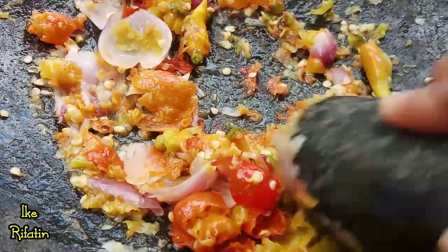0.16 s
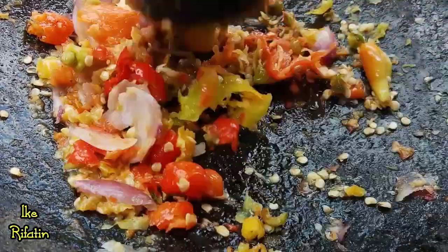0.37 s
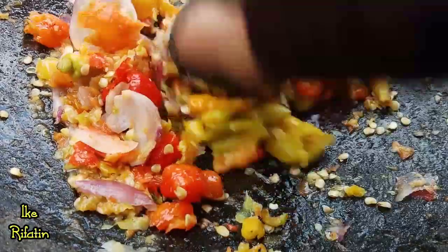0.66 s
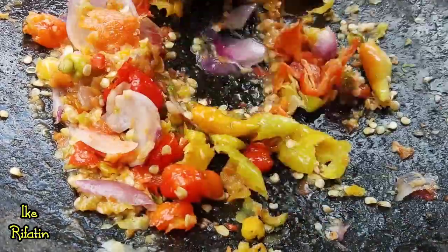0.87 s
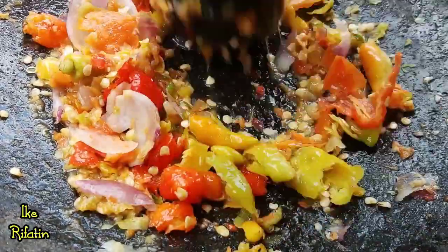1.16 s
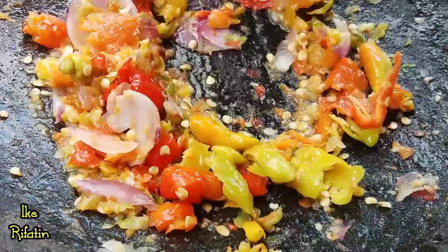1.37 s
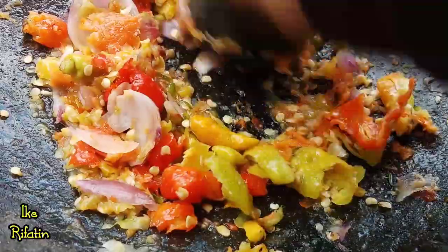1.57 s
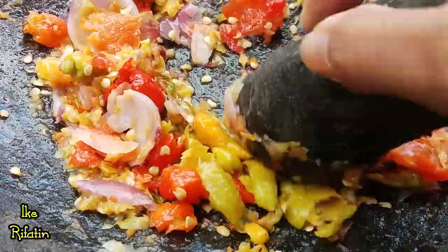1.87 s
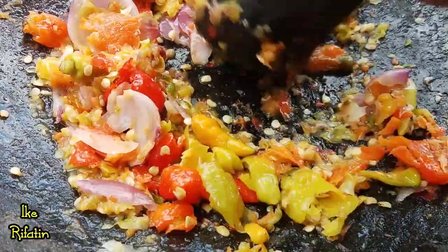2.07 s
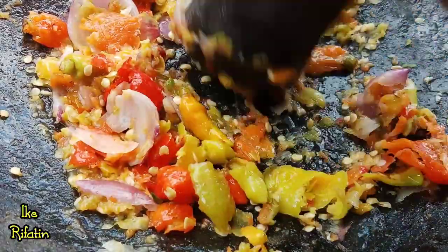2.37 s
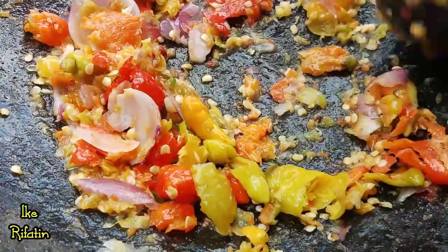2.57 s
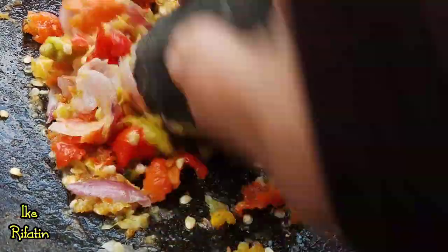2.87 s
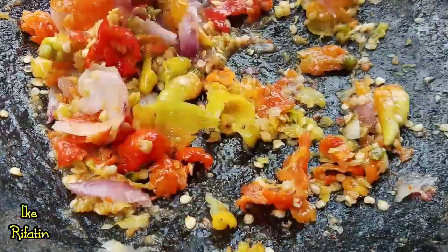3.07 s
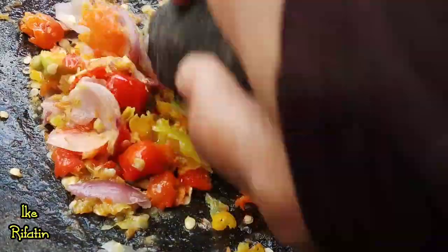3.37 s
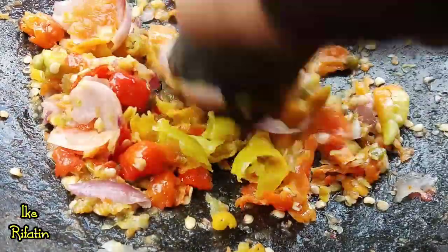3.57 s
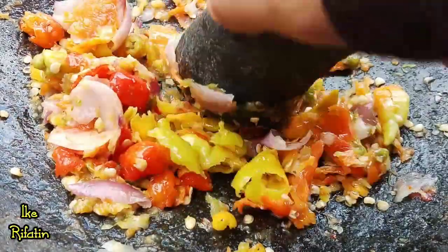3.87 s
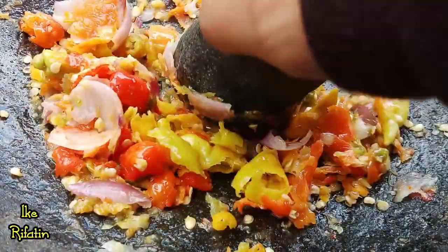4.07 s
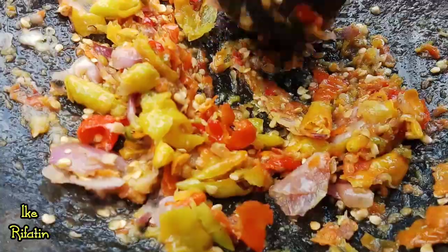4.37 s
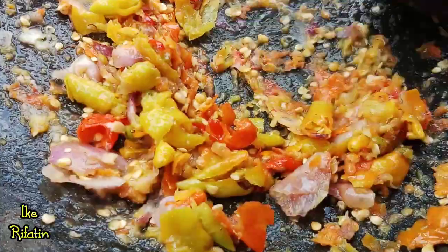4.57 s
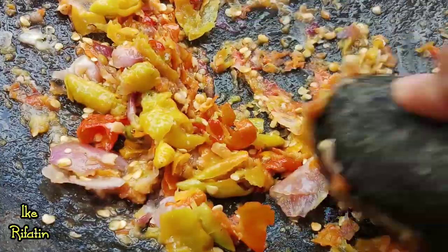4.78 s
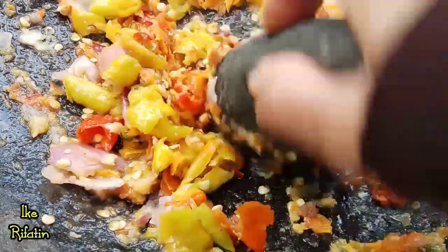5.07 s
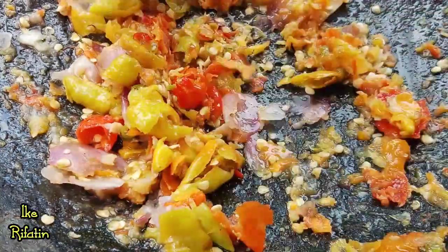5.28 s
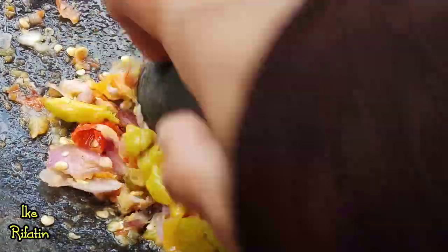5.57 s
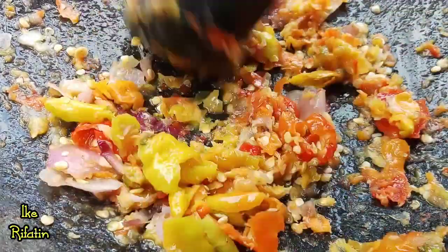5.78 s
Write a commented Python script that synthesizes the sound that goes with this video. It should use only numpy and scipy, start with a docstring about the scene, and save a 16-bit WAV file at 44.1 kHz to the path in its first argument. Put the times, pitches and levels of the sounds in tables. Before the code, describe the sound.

A stone pestle grinds wet chillies in a stone mortar, with gritty squelching scrapes and a few hard, clinking stone knocks.

```python
"""Stone pestle and mortar with wet chillies

A stone pestle knocks, chatters and grinds wet chillies in a shallow stone mortar, close to a phone.
Each touch sums short thud modes and resets the level of decaying sines, the stone's ring and overtones.
Dragging is band-passed grainy noise with bursts of crunch; seeds and skins crack as tiny noise bursts.
A short tail of the walls follows; a low rumble, a swelling drone and faint hiss of shaped noise lie under it."""
import sys
import numpy as np
from scipy import signal
from scipy.fft import rfft, irfft
from scipy.io import wavfile
from scipy.ndimage import uniform_filter1d

SR = 44100
rng = np.random.default_rng(int(sys.argv[2]) if len(sys.argv) > 2 else 0)


def log_audio(samples):
    """Write samples as a 16-bit WAV file to the path given in sys.argv[1]."""
    # one column per channel
    frames = np.atleast_2d(samples).T
    # limit to full scale, then quantise
    limited = np.clip(frames, -1, 1)
    pcm = np.round(limited * 32767).astype(np.int16)
    wavfile.write(sys.argv[1], SR, pcm)


N = 261954

# stone on stone, each contact of the chattering pestle, levels ahead of the mode offsets:
# (time [s], thud level [dB], ring level after the touch [dB])
CONTACTS = [(0.1369, -47, -45), (0.1707, -26.5, -30), (0.1818, -36, -23.5), (0.19, -32.5, -32),
            (0.223, -35, -31), (0.23, -28.5, -48), (0.2406, -33.5, -36), (0.29, -37, -36.5),
            (0.295, -40, -39), (0.3006, -33, -44), (0.3069, -38, -44), (0.3085, -32, -22.5),
            (0.3135, -33.5, -25.5), (0.3233, -27.5, -24), (0.3259, -43, -41), (0.3576, -63, -43.5),
            (0.7186, -36.5, -38), (0.7301, -32.5, -43), (0.9668, -34, -58), (0.9773, -37, -53),
            (1.4997, -11.5, -4.5), (1.5071, -10, -9), (1.5112, -13, -6), (1.5232, -35.5, -18),
            (1.529, -26.5, -27), (1.538, -25.5, -29), (1.542, -27.5, -27), (1.94, -31, -33.5),
            (1.9502, -34.5, -59), (1.9557, -26, -44), (2.1952, -35.5, -58), (2.199, -48, -54),
            (2.203, -39.5, -62), (2.208, -48, -64), (2.2802, -35.5, -67), (2.2842, -43, -54.5),
            (2.2886, -37.5, -53.5), (2.2942, -32, -67), (2.3125, -33.5, -57), (2.759, -15.5, -5),
            (2.7749, -12.5, -8), (2.7905, -33.5, -15), (2.7942, -17, -14.5), (2.8066, -19, -12.5),
            (2.8117, -27, -16), (2.8161, -24.5, -20), (2.865, -15, -5), (2.8716, -17, -6.5),
            (2.8809, -50, -20), (2.8874, -45, -17), (2.901, -49, -21), (3.34, -46, -56), (3.366, -52, -61),
            (4.7437, -14.5, -6), (4.7566, -24, -3.5), (4.7763, -29.5, -12.5), (4.8442, -37, -24),
            (4.8492, -22, -8.5), (4.8528, -41, -13.5), (4.8668, -25.5, -23), (4.8727, -20, -14.5),
            (4.877, -23.5, -35), (4.884, -38.5, -31), (4.8928, -29.5, -26.5), (4.8977, -26, -33),
            (4.915, -33, -42.5), (4.959, -29, -20.5), (5.5587, -12.5, -4.5), (5.5646, -16, -8.5),
            (5.5688, -16.5, -8), (5.5736, -24, -12.5), (5.5988, -31, -28), (5.6318, -26, -43),
            (5.635, -30, -46), (5.639, -34, -42.5), (5.643, -23, -34), (5.647, -28, -32),
            (5.6491, -32, -32), (5.6544, -39, -28), (5.6588, -23, -39), (5.665, -37, -43),
            (5.8846, -48, -44)]
# where each blow or bounce lands, before the touches vary it: (time [s], ring pitch [Hz], left lag [ms],
# thud left minus right [dB], ring left minus right [dB], ring damping [dB/s],
# bright minus dull thud modes [dB], overtone drive [dB])
LANDINGS = [(0.13, 2158, 0.15, 1.5, 2.5, 550, 7, 4), (0.28, 2155, 0.11, 3, -2.5, 500, -3, 10.5),
            (0.7, 2160, 0.061, 7, 15, 350, 8, -6), (1.49, 2151, -0.082, 3.5, 7, 199.5, 7.5, 1),
            (1.505, 2195, -0.12, 3, 9.5, 801, 9, 0.5), (1.9, 2156, 0.13, 3.5, -9, 600, -1, 11),
            (2.15, 2166, 0.15, 3, -3, 298, -5, 14.5), (2.75, 2139, -0.019, -1, 4.5, 58.5, 5.5, 10.5),
            (2.774, 2140, 0.24, -0.5, 8, 149.5, 5, 4), (2.79, 2156, -0.12, 2, 3, 902.5, -5.5, 11),
            (2.86, 2140, 0.15, 4.5, 1.5, 610, 2.5, 1), (3.33, 2156, 0.1, 4, -0.5, 300, 12, -6.5),
            (4.73, 2145, 0.048, 3, 0, 200.5, 7.5, 5), (4.755, 2148, 0.15, 0.5, 12, 599.5, -4.5, 0),
            (4.84, 2157, -0.2, 3, 0, 555.5, -10, 11), (4.95, 2144, 0.15, 4, -2, 573, -24.5, -2),
            (5.55, 2174, 0.1, 5, -8, 898, 16, -4.5), (5.62, 2172, 0.13, 5.5, -1, 497, 1, -1)]


def undb(db):
    """Decibels to linear gain."""
    return 10 ** (np.asarray(db) / 20)


def unit(x):
    """Scale each channel to an RMS of 1."""
    return x / np.sqrt(np.mean(x ** 2, axis=-1, keepdims=True))


def curve(table):
    """Columns of (time, ..) rows joined by straight lines."""
    times, *columns = np.transpose(table)
    return [np.interp(np.arange(N) / SR, times, column) for column in columns]


def held(table):
    """Time since the latest row, and that row's columns."""
    table, t = np.asarray(table, float), np.arange(N) / SR
    latest = np.searchsorted(table[:, 0], t, "right") - 1
    rows = table[np.maximum(latest, 0)]
    return t - rows[:, 0], rows[:, 1:].T


def sides(pan_db):
    """Gains of the two ports (left minus right in dB) at constant mean power."""
    pair = undb(np.array([pan_db, -pan_db]) / 2)
    return pair / np.sqrt(np.mean(pair ** 2, axis=0))


def walk(rate):
    """Random levels held 1 / rate s, smoothed by two running means; spread near 1."""
    hold = int(SR / rate)
    steps = np.repeat(rng.standard_normal(N // hold + 1), hold)
    return 1.054 * uniform_filter1d(uniform_filter1d(steps, hold), hold)[:N]


def band(x, lo_hz, hi_hz, order):
    """Butterworth band-pass."""
    return signal.sosfilt(signal.butter(order, [lo_hz, hi_hz], "band", fs=SR, output="sos"), x)


def body(x, peaks, patchy_db=0):
    """Sum of band-passes (Hz, width, dB) of alternating sign; each may wander in level on its own."""
    out = 0
    for k, (hz, width, db) in enumerate(peaks):
        wander_db = patchy_db * walk(40) if patchy_db else 0
        out = out + (-1) ** k * undb(db + wander_db) * band(x, hz - width / 2, hz + width / 2, order=2)
    return out


def coloured(points):
    """Two unrelated noises of RMS 1 with the given (Hz, dB) spectrum, joined over log frequency."""
    hz, db = np.transpose(points)
    f = np.maximum(np.arange(N // 2 + 1) * SR / N, 1)
    shape = undb(np.interp(np.log(f), np.log(np.maximum(hz, 1)), db))
    return unit(irfft(rfft(rng.standard_normal((2, N))) * shape, N))


def grit(spread_db, share):
    """Noise of countless grains, a few much larger; share = likeness of the two ports."""
    own, common = rng.standard_normal((2, N)), rng.standard_normal(N)
    grain_db = spread_db * np.minimum(rng.standard_exponential(N // 32 + 1), 5.)
    size = uniform_filter1d(undb(grain_db).repeat(32)[:N], size=24)
    return size * (np.sqrt(np.clip(1 - share, 0, 1)) * own + np.sqrt(np.clip(share, 0, 1)) * common)


def mode(x, hz, t60):
    """A decaying sine, peak near 1 for a unit impulse: a two-pole resonator."""
    radius, w = np.exp(-np.log(1000) / (t60 * SR)), 2 * np.pi * hz / SR
    return signal.lfilter([0, radius * np.sin(w)], [1, -2 * radius * np.cos(w), radius * radius], x)


def background():
    """Wavering low rumble from outside, partly alike at both ports, with a swelling drone and faint wide hiss."""
    # fader moves ahead of the layer mix: (time [s], bass level [dB], mid level [dB], wide hiss level [dB])
    rumble_levels = [(0, -64.5, -85.5, -82), (.66, -62, -81, -77.5), (.75, -51.5, -69.5, -84),
                     (1.2, -50, -62.5, -66), (1.5, -53.5, -66.5, -79.5), (2.5, -54.5, -69, -76),
                     (3.0, -55.5, -78, -82), (3.12, -62, -82, -92.5), (3.9, -61.5, -79.5, -73),
                     (4.15, -58, -76, -76.5), (4.44, -57.5, -68.5, -76), (4.46, -55.5, -71, -65.5),
                     (4.9, -52, -56.5, -61), (5.3, -59.5, -70, -66.5), (5.94, -59, -64.5, -75)]
    # a low drone swells: (time [s], level [dB])
    drone_levels = [(3.85, -75), (3.95, -60.5), (4.15, -64.5), (4.2, -49.5), (4.44, -48), (4.47, -66),
                    (4.7, -85)]
    # relative spectra of the rumble's bass and of the wide hiss: (frequency [Hz], density [dB per Hz])
    bass_spectrum = [(12, -44), (20, -20.5), (59, -5), (113, -2), (162, 1.5), (217, -8), (256, -5),
                     (351, -17), (420, -17.5), (550, -38.5), (920, -120)]
    air_spectrum = [(880, -38.5), (1500, -9.5), (2250, 1.5), (2720, -2), (6760, -9), (8080, -13),
                    (14600, -14), (16000, -27)]
    mid_spectrum = [(250, -31.5), (450, 2.0), (800, -1.0), (1600, -9.0), (2500, -27.5)]
    drone_peaks = [(171, 33, 4.0), (294.2, 130, -17.5)]

    bass_db, mid_db, air_db = curve(rumble_levels)
    # the second noise goes in with opposite sign at the two ports, for width
    spread = np.array([[1], [-1]])
    low, middle = coloured(bass_spectrum), coloured(mid_spectrum)
    bass = undb(bass_db + 2 * walk(10)) * sides(4.5)[:, None] * (low[0] + .4 * spread * low[1])
    mid = undb(mid_db) * (middle[0] + .7 * spread * middle[1])
    drone = undb(curve(drone_levels)[0]) * unit(body(rng.standard_normal(N), drone_peaks))
    return bass + mid + drone + undb(air_db) * coloured(air_spectrum)


def bumps():
    """Single low sine cycles under a half-sine swell, heard by the left port alone."""
    # low bumps: (time [s], level before the swell [dB], frequency [Hz])
    low_bumps = [(0.8654, -16, 144), (0.871, -24, 59), (0.888, -25, 89)]
    out = np.zeros((2, N))
    for s, db, hz in low_bumps:
        cycle = (np.arange(N) / SR - s) * hz
        swell = np.sin(np.pi * np.clip(cycle, 0, 1))
        out[0] -= undb(db) * np.sin(2 * np.pi * cycle) * swell
    return out


def kitchen(x):
    """Short diffuse tail of the walls: convolution with decaying noise."""
    level_db, t60_s = -28.5, 0.1
    t = np.arange(int(.4 * SR)) / SR
    tail = rng.standard_normal((2, len(t))) * undb(-60 * t / t60_s) * (t > .003)
    tail = undb(level_db) * tail / np.sqrt(np.sum(tail ** 2, axis=1, keepdims=True))
    return signal.fftconvolve(x, tail, axes=1)[:, :N]


def cracks():
    """Seeds and skins crack: a burst of a millisecond or two, boosted around each crack's pitch."""
    # (time [s], level ahead of burst shaping [dB], pitch [Hz])
    crack_hits = [(0.517, -37, 4000), (0.8438, -30, 3200), (0.967, -26.5, 7100), (0.9833, -34, 6900),
                  (1.0148, -30, 2720), (1.176, -40, 6250), (1.288, -32, 6850), (1.572, -28, 5380),
                  (1.33, -39, 3000), (1.7072, -39.5, 3840), (1.835, -47.5, 6500), (1.842, -43.5, 7400),
                  (2.0906, -39.5, 4540), (2.11, -37.5, 5500), (2.1262, -34, 5100), (2.389, -39.5, 6700),
                  (2.4137, -30, 6300), (2.5698, -38, 5680), (2.9482, -30.5, 7630), (3.35, -39, 6370),
                  (3.605, -43, 6000), (3.7668, -41.5, 2980), (3.7835, -35, 6430), (3.9541, -40, 4490),
                  (3.9782, -43.5, 5490), (4.093, -41.5, 5260), (4.1673, -31.5, 3120), (4.543, -41, 2510),
                  (5.03, -34, 6900), (5.078, -35.5, 3000), (5.1017, -38, 12300), (5.3498, -32, 5370),
                  (5.7014, -27, 3160)]
    out, t = np.zeros((2, N)), np.arange(300) / SR
    noise = rng.standard_normal((len(crack_hits), 2, len(t)))
    for (s, db, hz), burst in zip(crack_hits, noise):
        burst = burst * np.exp(-t / 0.0012)
        burst = 0.44 * burst + body(burst, [(hz, .5 * hz, 6.0)])
        start = int(s * SR)
        out[:, start:start + len(t)] += undb(db) * sides(8.9)[:, None] * burst
    return out


def crunch():
    """Wet bits burst at random, each a short decaying sine at one of twelve pitches."""
    out = 0
    for hz in np.geomspace(2400, 13000, 12):
        happens = rng.random(N) < 45 / SR  # about 45 bursts a second at each pitch
        pops = happens * undb(3 * np.minimum(rng.standard_exponential(N), 3))
        port_gain = undb(2 * rng.standard_normal((2, N)))
        out = out + mode(pops * port_gain, hz, 25 / hz) * np.sqrt(hz)
    return unit(out)


def pressure():
    """Levels of hiss, scrape and fizz: each stroke sets in, drifts from start to end level, lifts off, settles."""
    # dragging strokes, levels ahead of swell and layer trims: (start [s], length [s], hiss at the start [dB],
    # hiss at the end [dB], coarse scrape minus hiss [dB], fine fizz minus hiss [dB])
    drag_strokes = [(0.0, 0.013, -74, -69.5, -1, 0), (.17, 0.078, -67.5, -59, 6.5, 4),
                    (0.297, 0.026, -51, -63, -9, 1), (0.356, 0.093, -56.5, -47, -3, 1),
                    (0.453, 0.032, -53, -51.5, 2, -5), (0.722, 0.088, -51.5, -51.5, 3.5, -2.5),
                    (.825, 0.031, -44.5, -42, 0, -6), (0.903, 0.051, -55.5, -46, 0.5, -4),
                    (.96, 0.053, -44.5, -40.5, -2.5, -4.5), (1.077, 0.062, -42.5, -38, -5.5, -3),
                    (1.154, 0.053, -42, -44, -5.5, -1.5), (1.239, 0.097, -52, -44.5, -3.5, 0.5),
                    (1.501, 0.047, -60, -57, 4, 0), (1.57, 0.093, -38.5, -46, -5, -1.5),
                    (1.677, 0.13, -52, -52, -4.5, -2.5), (1.854, .07, -61.5, -59.5, -6, -1),
                    (1.941, 0.086, -46, -52.5, -13, -3.5), (2.056, .12, -60, -53.5, -6.5, -0.5),
                    (2.272, .11, -66, -50.5, -13, -1), (2.415, 0.12, -50, -52.5, -5, -5),
                    (2.762, 0.12, -62, -58.5, 7, 6.5), (2.909, 0.064, -56, -47.5, -6.5, 2.5),
                    (2.993, 0.065, -45.5, -49.5, -2, -3), (3.332, 0.015, -59, -53, -7.5, -10.5),
                    (3.375, 0.11, -57.5, -56, 0.5, -2.5), (3.501, 0.11, -70.5, -53.5, -0.5, -0.5),
                    (3.726, 0.064, -66, -52.5, -2, -1.5), (4.1, .05, -61, -62, 0, -13),
                    (4.163, 0.012, -53, -55.5, -1, -5), (4.76, 0.08, -60, -67, 11, 7.5),
                    (4.858, 0.072, -50, -57, -13, -2.5), (4.948, 0.13, -52, -47.5, -1.5, -1.5),
                    (5.11, 0.053, -62, -62, -3.5, -2), (5.175, 0.053, -55, -46, -7.5, -2.5),
                    (5.318, .05, -55, -49, -4.5, -2), (5.568, .04, -71.5, -67, -2, 3.5),
                    (5.64, 0.12, -47, -57.5, -1.5, -5), (5.787, 0.084, -57, -46.5, -3.5, -3.5)]
    attack_db_per_s, release_db_per_s = 1799.5, 600.5
    settle_db, settle_db_per_s = -16, 110.5  # the pulp fizzes on after the stone lifts
    swell_db, soften_s = 2, 0.007  # a stroke is fullest in its middle; its edges are rounded

    t, out = np.arange(N) / SR, np.zeros((3, N))
    for start, length, start_db, end_db, coarse_db, fine_db in drag_strokes:
        after = np.maximum(t - start - length, 0)
        settle = (after > 0) * undb(settle_db - settle_db_per_s * after)
        lift = undb(-release_db_per_s * after) + settle
        db = np.interp(t, [start, start + length], [start_db, end_db])
        db = db - attack_db_per_s * np.maximum(start - t, 0)
        db = db - swell_db * np.clip(2 * (t - start) / length - 1, -1, 1) ** 2
        out = np.maximum(out, undb(db) * lift * undb([[0], [coarse_db], [fine_db]]))
    return uniform_filter1d(out, int(soften_s * SR))


def drag():
    """Stone slides over wet pulp in slips: coarse scrape, hiss, fine fizz and crunch."""
    # resonances of the three noise layers: (centre [Hz], width [Hz], relative level [dB])
    coarse_peaks = [(610, 1200, -4), (1380, 900, -3), (2310, 60, -0.5), (1850, 640, -3.5), (2810, 1300, 8),
                    (4310, 1300, -2)]
    hiss_peaks = [(5487, 2300, -0.5), (7186, 1200, 0)]
    fine_peaks = [(8706, 1500, -1.5), (12340, 4500, -2), (14700, 1200, -9.5)]
    hiss_gain, coarse_gain, fine_gain = pressure()
    slips = undb(1.4 * walk(75) + 1.8 * walk(50))
    coarse = coarse_gain * undb(1.5) * unit(body(grit(2.6, 0.088), coarse_peaks, patchy_db=2.5))
    hiss = hiss_gain * undb(-1.0) * unit(body(grit(2.8, 0.014), hiss_peaks, patchy_db=2.94))
    fine = fine_gain * undb(-2.3) * unit(body(grit(2.3, .05), fine_peaks, patchy_db=1.8))
    wet = hiss_gain * undb(-13.5) * crunch()
    return slips * sides(1.5)[:, None] * (coarse + hiss + fine + wet)


def overtones():
    """Higher modes of the stone, level reset by each touch; they grow faster than the thud does."""
    # (frequency [Hz], level offset [dB], t60 [s], growth [dB per dB of thud])
    upper_modes = [(3724, -27, 0.18, 1.16), (4820, -29.5, 0.076, 1.05), (7680, -36, .04, 1.5),
                   (8800, -42, .03, 1.8)]
    since, (db, *_) = held(CONTACTS)
    _, (_, _, pan_db, _, _, _, drive_db) = held(LANDINGS)
    out, t = 0, np.arange(N) / SR
    for hz, mode_db, t60, growth in upper_modes:
        level_db = growth * db + mode_db + drive_db - 60 * since / t60 + 1.9 * walk(150)
        size = (since >= 0) * undb(level_db)
        # the phase wanders; the right port runs 1 radian ahead
        phase = 2 * np.pi * hz * t + 1.4 * walk(150) + np.array([[0], [1]])
        out = out + uniform_filter1d(size, size=20) * np.sin(phase)
    return out * sides(pan_db)


def thuds():
    """Short dull knocks of the heavy bowl: impulses into damped modes, and the rattle after them."""
    # (frequency [Hz], level offset [dB], t60 [s], share of brightness [0..1])
    thud_modes = [(640, -5.5, 0.016, 0), (976, -2.5, 0.0053, 0.46), (1310, -2, 0.0043, 1),
                  (2930, -22.5, .004, 0.89)]
    bright_per_db, bright_at_db = .5, -25.5  # harder touches are brighter
    weight_hz, weight_db, weight_t60_s = 195, -23.5, 0.016  # the board under the bowl answers

    s, db, _ = np.transpose(CONTACTS)
    _, landing = held(LANDINGS)
    _, lag_ms, pan_db, _, _, bright_db, _ = landing[:, (s * SR).astype(int)]
    bright_db = bright_db + bright_per_db * (db - bright_at_db)
    at = np.round(SR * np.array([s + lag_ms / 1000, s])).astype(int)

    def strike(gain):
        """One impulse per touch at each port, the left one delayed by its lag."""
        x = np.zeros((2, N))
        x[[[0], [1]], at] = gain * sides(pan_db)
        return x

    knocks = 0
    for hz, mode_db, t60, share in thud_modes:
        knocks = knocks + mode(strike(undb(db + mode_db + (share - .5) * bright_db)), hz, t60)
    # the bowl rattles on its rest for a moment
    shake = signal.lfilter([1], [1, -np.exp(-1 / (0.019 * SR))], strike(undb(0.88 * db - 29.0)))
    rattle = shake * unit(band(grit(1.9, .8), 450, 980, order=1))
    weight = mode(strike(undb(db + weight_db)), weight_hz, weight_t60_s)
    return band(knocks + rattle, 470, 4500, order=3) + weight


def ring():
    """Main mode of the stone, a close pair, one to each port; a touch resets its level, pressure damps it."""
    pair_split_hz = 5.2  # the right port hears the upper mode
    ring_scatter = 0.26  # dB per dB: the weaker a touch, the more it shifts the balance
    linger_db, linger_db_per_s = -29, 129  # part of the ring escapes the damping

    scatter = ring_scatter * rng.standard_normal((len(CONTACTS), 1))
    since, (_, ring_db, scatter) = held(np.hstack([CONTACTS, scatter]))
    landed, (hz, lag_ms, _, pan_db, damping, *_) = held(LANDINGS)
    # once the pestle rests on the pulp the ring dies whatever the touch was
    damped = undb(-damping * since - 380 * np.maximum(since - .04, 0))
    fade = damped + undb(linger_db - linger_db_per_s * since)
    size = (since >= 0) * fade * undb(ring_db + 1.3 * walk(120)) * sides(pan_db + scatter * ring_db)
    # each blow restarts the phase
    left = (hz - pair_split_hz / 2) * (landed - lag_ms / 1000)
    right = (hz + pair_split_hz / 2) * landed
    return band(size * np.sin(2 * np.pi * np.array([left, right])), 1100, 2800, order=2)


def scene():
    """The mortar and its wall tail over the bumps and the background."""
    near = ring() + overtones() + thuds() + drag() + cracks()
    return near + kitchen(near) + bumps() + background()


def record(dry):
    """The phone rounds the loudest peaks and cuts the top."""
    top_hz = 15450
    rounded = dry / (1 + np.abs(dry) ** 6) ** (1 / 6)
    return .97 * signal.sosfilt(signal.ellip(10, .2, 70, top_hz, fs=SR, output="sos"), rounded)


dry = scene()
out = record(dry)
log_audio(out)
```